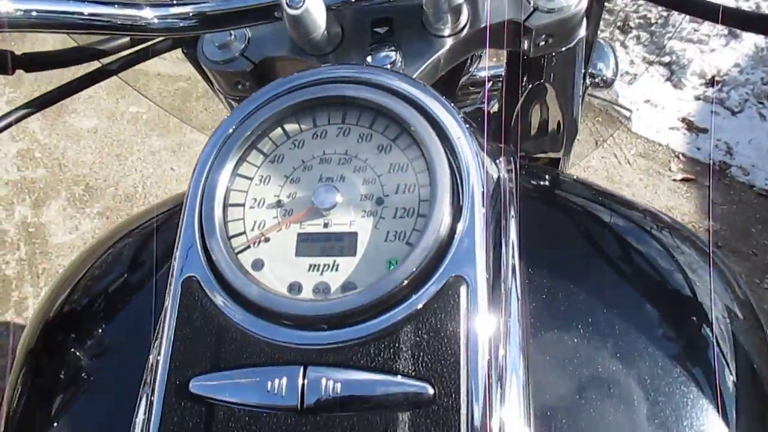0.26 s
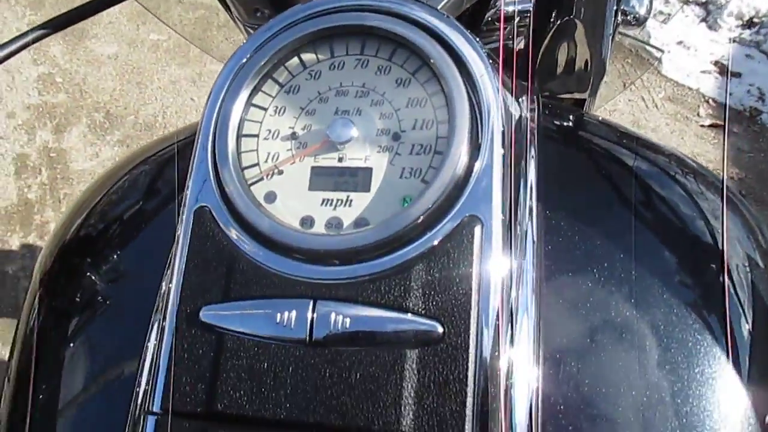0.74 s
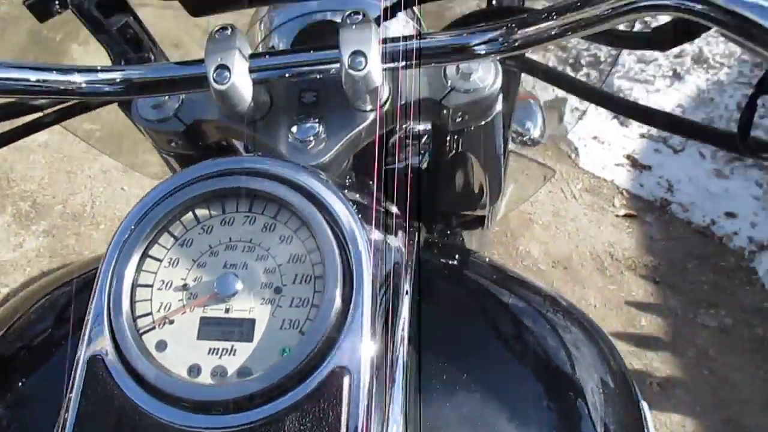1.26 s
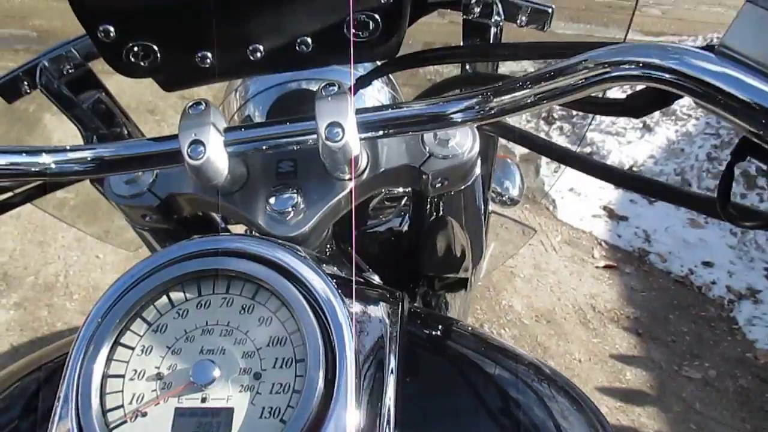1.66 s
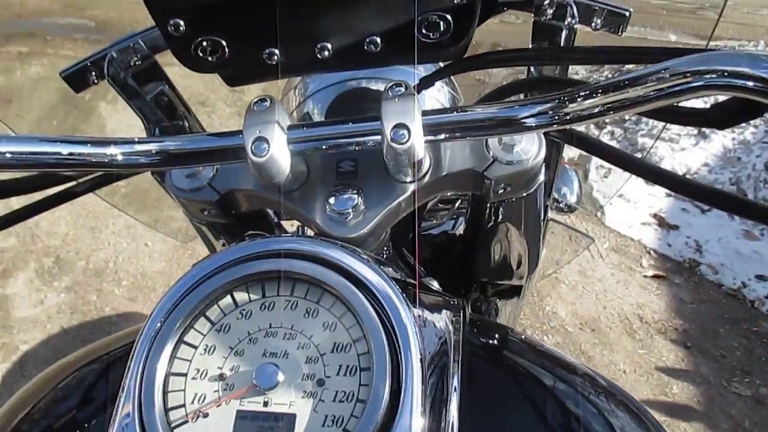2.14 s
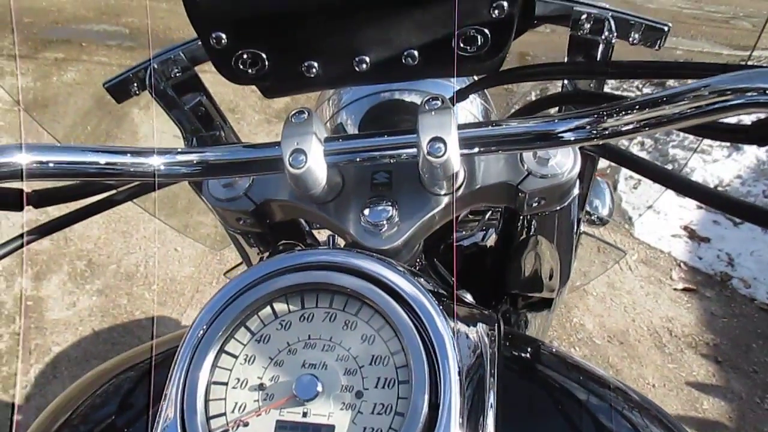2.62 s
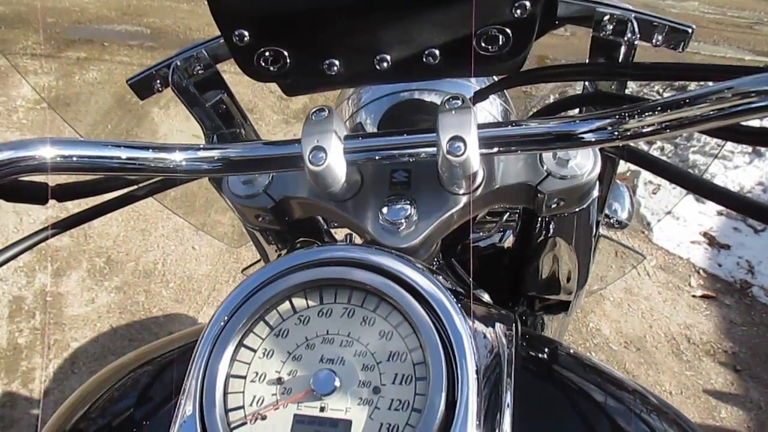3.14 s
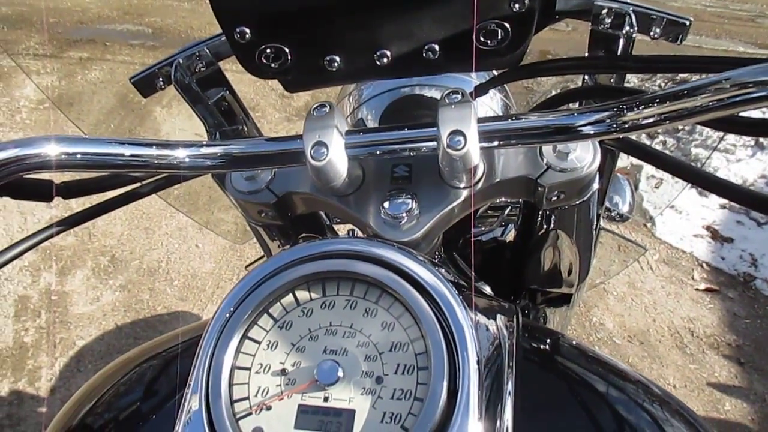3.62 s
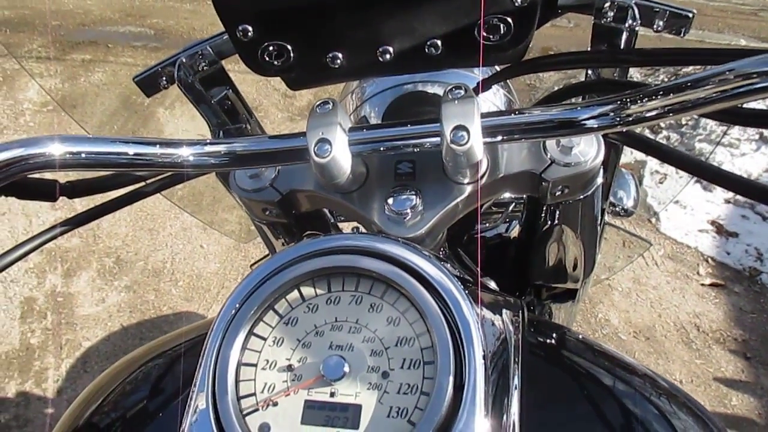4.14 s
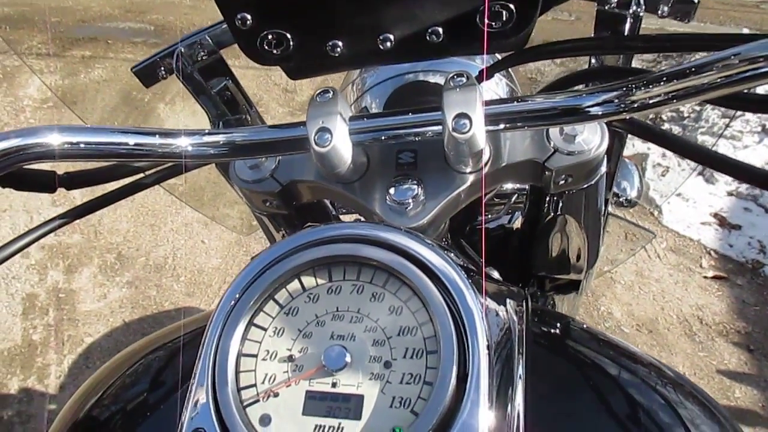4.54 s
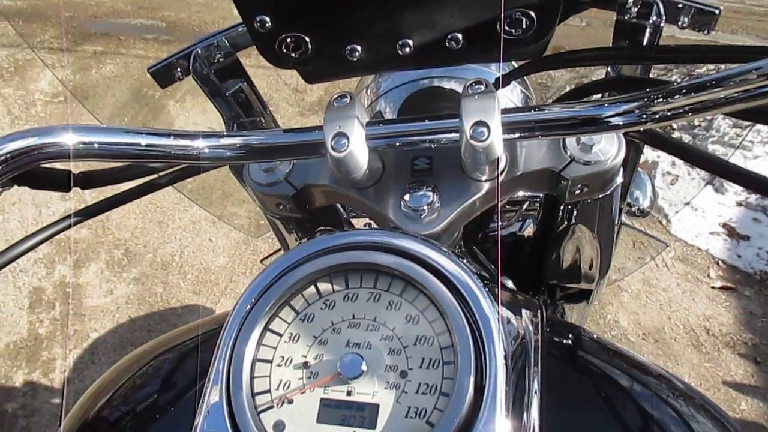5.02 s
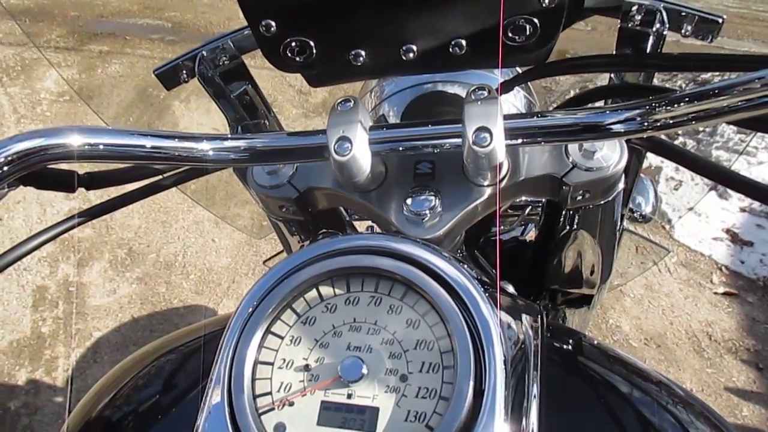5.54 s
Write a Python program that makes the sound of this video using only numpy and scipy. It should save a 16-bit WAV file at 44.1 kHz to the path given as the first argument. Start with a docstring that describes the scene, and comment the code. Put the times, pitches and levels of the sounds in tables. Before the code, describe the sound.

Close, throbbing motorcycle idle with ticking valves, broken by three short throttle twists, a couple of metallic knocks and slight stumbles.

```python
"""First you hear a V-twin motorcycle idling outdoors, from just above its tank.
Its exhaust beats come in pairs and echo in the pipes, over engine clatter and ticking valves.
The throttle gets three quick twists, or blips. Each time the air intake barks and the revs jump;
as they sag, the cold engine coughs and misses a beat. Two of the blips bring a metallic knock.
An automatic volume control turns the sound down at loud barks, then creeps back up."""
import sys
import numpy as np
from scipy import signal
from scipy.fft import rfft, irfft
from scipy.io import wavfile
from scipy.ndimage import uniform_filter1d

SR = 44100
rng = np.random.default_rng(int(sys.argv[2]) if len(sys.argv) > 2 else 0)


def put_to_file(sound):
    """Save the sound as 16-bit audio at rate SR, in the file named by the first command-line argument."""
    columns = np.atleast_2d(sound).T  # one column per channel
    safe = np.clip(columns, -1, 1)
    whole_steps = np.round(safe * 32767)
    wavfile.write(sys.argv[1], SR, whole_steps.astype(np.int16))


N = 254891
T, HZ = np.arange(N) / SR, np.fft.rfftfreq(2 * N, 1 / SR)
REAR_LAG_CYCLES, START_CYCLES = .354, .056  # one engine cycle is two turns of the crank

# each cylinder's exhaust pulse and its echoes in the pipe: delay_s, level_db, bandwidth_hz
FRONT_PIPE = [(0, -3.9, 106), (.0151, 1.3, 88), (.0259, -2, 95)]
REAR_PIPE = [(0, -5.3, 148), (.0151, -5.8, 122), (.0255, -12, 176), (.0428, -12.5, 110)]
# notes at which the silencers and the engine cases ring: pitch_hz, width_hz, boost_db
SILENCER_NOTES = [(94.6, 17.5, 2.5), (159, 16.7, 10), (185, 6, 0.5)]
CASE_NOTES = [(344, 29, 1), (440, 30, 1.5), (529, 54.4, 7), (705, 60.5, 2), (838, 82, 2.5), (973, 52, 2.5),
              (1117, 64, -2.5), (1232, 22, 6), (1385, 35, 7.5), (1529, 76, 7), (1668, 48, 5.5),
              (1925, 31, 6.5), (1997, 67, 7.5), (2380, 126, -2), (2570, 240, 1), (3595, 109, 3),
              (3947, 154, 8), (5626, 195, 4.5), (7710, 230, 4), (8860, 300, 3)]
# valve and piston taps in each cycle: start_cycles, length_cycles, clatter_db, tick_db
ENGINE_TAPS = [(.21, 0.089, -11.5, 2), (0.57, 0.1, -10.5, 2), (.53, 0.0347, -7, -20),
               (.8, 0.014, -8.5, -12.5), (0.9, 0.035, -36, -2.5)]
# the tone of each noise, from bass to treble: pitch_hz, level_db
RUMBLE_TONE = [(14, -37), (28, -13), (60, -5), (100, -5), (160, 0.5), (200, -7.5), (290, -15.5),
               (600, -36.5), (2000, -56.5)]
CLATTER_TONE = [(140, -30.5), (230, 2), (310, -10.5), (345, -3.5), (606, -6), (698, -4.5), (877, -11),
                (975, -7), (1140, -10.5), (1250, -8), (1970, -9.5), (2810, -19), (5480, -27), (10900, -35),
                (15500, -54)]
TICK_TONE = [(1500, -5), (2800, -17), (3700, -2.5), (4800, 2), (5600, 1.5), (7000, -6.5), (10500, -9.5),
             (13000, -18.5), (16000, -27)]
HISS_TONE = [(400, -31), (1800, 12), (4000, 0), (7000, -1), (10500, -3), (13000, -10.5), (16000, -20)]
BOOM_TONE = [(50, -19.5), (110, 2), (165, 8), (220, 1.5), (290, 0.5), (400, -7), (500, -7), (620, -11.5),
             (750, -8), (900, -19), (1400, -21.5), (3000, -34), (9000, -46), (16000, -58)]
RASP_TONE = [(300, -6.5), (900, 3.5), (1600, 5.5), (2300, -1.5), (3000, -7.5), (5000, -18), (13000, -29),
             (16000, -46)]
KNOCK_TONE = [(300, -11), (750, -3.5), (1050, -5.5), (1350, -21), (1550, -3), (1750, -8), (1950, 4),
              (2250, -4.5), (2600, -7), (3300, -22), (6000, -29), (14000, -50)]
# idle speed, which sags after a blip: time_s, speed_rpm
IDLE_SPEED = [(0, 1150.2), (.25, 1160.7), (.45, 1076.5), (1.1, 1149.5), (1.9, 1127.2), (2.7, 943.8),
              (3.4, 1090.1), (3.8, 1091.6), (4.4, 1201.4), (5.1, 961.7), (5.78, 824.4)]
# throttle blips: open_s, shut_s, hiss_db, push_db, pickup_s, climb_s, added_rpm, coast_s
BLIPS = [(1.962, 2.135, -27, 9.2, 1.9464, .1947, 651.8, 0.33),
         (4.4, 4.582, -29.3, 7.3, 4.4614, 0.1789, 686.2, 0.25),
         (5.102, 5.327, -36, 7.3, 5.2133, .0939, 827.6, .3229)]
# missed beats: time_s, change_db
MISFIRES = [(2.485, -16), (4.953, -9), (5.6, -9)]
# intake barks, and small coughs as the revs sag: start_s, length_s, boom_db, rasp_db
BARKS = [(2.014, 0.029, -7.5, -27.5), (2.07, 0.056, -5, -20), (2.406, 0.017, -18, -38),
         (4.451, 0.058, -13.5, -26), (4.541, 0.042, -8.5, -20.5), (4.774, 0.046, -20, -37),
         (4.89, 0.022, -17, -39.5), (5.158, 0.022, -14.5, -31), (5.203, 0.03, -12.5, -23.5),
         (5.253, 0.062, -12.5, -23.5), (5.466, .012, -20, -40), (5.52, 0.017, -17.5, -36)]
# knocks as the engine takes up the load: start_s, level_db
KNOCKS = [(2.019, -13), (5.2, -11.5)]


def amp(db):
    """Turns decibels into a gain to multiply by."""
    return 10 ** (np.asarray(db) / 20)


def unit_power(x):
    """Scales a signal to an average power of one."""
    return x / np.sqrt(np.mean(x ** 2) + 1e-20)


def tone(points):
    """Joins (pitch_hz, level_db) points into a gain for every frequency."""
    hz, db = np.transpose(points)
    return amp(np.interp(np.log(HZ + 1), np.log(hz), db))


def ring(x, gain):
    """Gives x a tone that rings after each tap, never before; white noise keeps its power."""
    log_gain = np.log(np.maximum(unit_power(gain), 1e-5))
    mirrored = np.interp(abs(np.fft.fftfreq(16384, 1 / SR)), HZ, log_gain)
    response = np.fft.ifft(np.exp(np.conj(signal.hilbert(mirrored)))).real[:8192]
    return signal.oaconvolve(x, response)[:N]


def wander(per_s):
    """Glides to a new random value per_s times a second."""
    return unit_power(np.interp(T * per_s, np.arange(N), rng.uniform(-1, 1, N)))


def grit(grain_db):
    """Rough noise, like many tiny hits of uneven size."""
    return unit_power(rng.standard_normal(N) * amp(grain_db * wander(900)))


def exhaust(cycles, rpm, strength_db, level_db=45.2, uneven_db=.96, jitter_s=.000318, outlet_hz=22):
    """Each cylinder sends a pulse down its own pipe, and the pipe echoes it back."""
    strength, beats = amp(strength_db), 0
    # at higher revs the valves open faster, so the pulses are shorter and brighter
    revved = np.clip((rpm - rpm[0]) / (rpm.max() - rpm[0]), 0, 1)
    for lag, pipe in ((0, FRONT_PIPE), (REAR_LAG_CYCLES, REAR_PIPE)):
        fires_at = np.flatnonzero(np.diff(np.floor(cycles - lag), prepend=np.floor(-lag - START_CYCLES)))
        size, late = rng.standard_normal((len(fires_at), 2)).T
        fires_at = np.clip(fires_at + (late * jitter_s * SR).astype(int), 0, N - 1)
        firings = np.zeros(N)
        firings[fires_at] = -strength[fires_at] * amp(uneven_db * size)
        for share, brightness in ((1 - revved, 1), (revved * amp(-4), 1.36)):
            echoes = sum(amp(db) * np.exp(-2j * np.pi * HZ * delay_s - (HZ / hz / brightness) ** 2)
                         for delay_s, db, hz in pipe)
            beats = beats + rfft(firings * share, 2 * N) * echoes
    silencer = 1 + sum((amp(db) - 1) / (1 + 2j * (HZ - hz) / width) for hz, width, db in SILENCER_NOTES)
    s = 1j * HZ / outlet_hz
    outlet = s * s / (1 + s / 2 + s * s)  # an open pipe end sends out no steady pressure
    low_cut = tone([(18, -24), (27, 0)])
    return amp(level_db) * irfft(beats * silencer * outlet * low_cut)[:N]


def gas_rumble(cycles, rpm, level_db=-28, depth=.095, speed_db=5):
    """Swirling gas swells after each pair of beats, and grows with the revs."""
    swell = (1 + depth * np.cos(2 * np.pi * (cycles - .5))) * amp(speed_db * np.log2(rpm / rpm[0]))
    return amp(level_db) * ring(rng.standard_normal(N) * swell, tone(RUMBLE_TONE))


def clatter_and_ticks(cycles, rpm, clatter_db=-28.5, tick_db=-44, speed_db=4, gear_share=.31):
    """Gears churn nonstop; valves and pistons hit at set points in each cycle and ring the cases."""
    churn, ticks = np.ones(N), np.zeros(N)
    for start, length, tap_db, click_db in ENGINE_TAPS:
        age = 2 * ((cycles - start) % 1) / length
        taps = age * np.exp(1 - age) * amp(wander(9))  # a cluster of taps swells and dies
        churn += amp(tap_db) * taps
        ticks += amp(click_db) * taps
    # the same gear teeth and chain links meet again in every cycle
    link_sizes = rng.standard_normal(512)
    link = np.floor(cycles * len(link_sizes)).astype(int)
    gears = unit_power(np.diff(link, prepend=link[0]) * link_sizes[link % len(link_sizes)])
    rattle = np.sqrt(gear_share) * gears + np.sqrt(1 - gear_share) * grit(1.536)
    cases = amp(sum(db / (1 + (2 * (HZ - hz) / width) ** 2) for hz, width, db in CASE_NOTES))
    # the thin cooling fins ring at many close, uneven pitches in the treble
    fins = amp(2 * np.clip(HZ / 2500, 0, 1) * np.interp(HZ / 45, np.arange(N), rng.standard_normal(N)))
    treble_cut = tone([(2500, -.22), (6000, -1.8)])
    clatter = amp(clatter_db) * ring(rattle * churn, tone(CLATTER_TONE) * cases * fins * treble_cut)
    valves = amp(tick_db) * ring(grit(.8) * ticks, tone(TICK_TONE) * fins)
    return (clatter + valves) * amp(speed_db * np.log2(rpm / rpm[0]))


def throttle(snap_s=.018, suction_db=-43.5, misfire_s=.03, droop_db_per_rpm=.008):
    """Each blip lets in air: the beats get stronger and the revs climb, then coast down."""
    rpm = np.interp(T, *np.transpose(IDLE_SPEED))
    strength_db, hiss_gain = 0, 0
    for open_s, shut_s, hiss_db, push_db, pickup_s, climb_s, added_rpm, coast_s in BLIPS:
        held = np.exp(-np.maximum(T - shut_s, 0) / snap_s)
        opening = np.clip((T - open_s) / (shut_s - open_s), 0, 1) ** .64 * held  # rolls on, snaps shut
        coasting = np.exp(-(np.maximum(T - pickup_s - climb_s, 0) / coast_s) ** 2)
        surge = np.clip((T - pickup_s) / climb_s, 0, 1) * coasting
        rpm = rpm + added_rpm * surge
        strength_db = strength_db + push_db * np.sqrt(surge) * held
        suction = amp(suction_db) * surge * (1 - held)  # high revs pull air past the shut throttle
        hiss_gain = hiss_gain + amp(hiss_db) * opening + suction
    missed_db = sum(db * (abs(T - time_s) < misfire_s / 2) for time_s, db in MISFIRES)
    droop_db = droop_db_per_rpm * np.minimum(rpm - rpm[0], 0)  # beats weaken below normal idle
    return rpm, strength_db + droop_db + missed_db, hiss_gain


def air_intake(hiss_gain, rise_s=.012, fall_s=.0189):
    """Air hisses through the throttle, and each gulp of it barks in the air box."""
    boom_gain, rasp_gain = np.zeros(N), np.zeros(N)
    for start_s, length_s, boom_db, rasp_db in BARKS:
        age_s = T - start_s
        gulp = np.clip(age_s / rise_s, 0, 1) * np.exp(-np.maximum(age_s - length_s, 0) / fall_s)
        boom_gain += amp(boom_db) * gulp
        rasp_gain += amp(rasp_db) * gulp
    hiss = ring(grit(2) * hiss_gain, tone(HISS_TONE))
    boom = ring(grit(5) * boom_gain, tone(BOOM_TONE))
    rasp = ring(grit(2.5) * rasp_gain, tone(RASP_TONE))
    return hiss + boom + rasp


def knocks(rise_s=.0016, decay_s=.023, level_db=-1):
    """A hard blow makes the engine block ring briefly at many pitches."""
    blows = sum(amp(db) * np.clip((T - start_s) / rise_s, 0, 1) * np.exp(-abs(T - start_s) / decay_s)
                for start_s, db in KNOCKS)
    return amp(level_db) * ring(rng.standard_normal(N) * blows, tone(KNOCK_TONE))


def scene():
    """The throttle sets the engine's pace, and all the sounds add up in one channel."""
    rpm, strength_db, hiss_gain = throttle()
    cycles = START_CYCLES + np.cumsum(rpm / 120) / SR
    engine = exhaust(cycles, rpm, strength_db) + gas_rumble(cycles, rpm) + clatter_and_ticks(cycles, rpm)
    return (engine + air_intake(hiss_gain) + knocks())[None]


def record(dry, limit_db=-9, recover_db_per_s=6, average_s=.017, top_hz=15700):
    """Volume drops fast on loud sound and creeps back; peaks are rounded and the top treble is cut."""
    power_db = 10 * np.log10(abs(uniform_filter1d(dry[0] ** 2, int(average_s * SR))) + 1e-12)
    recovery_db = T * recover_db_per_s
    peak_db = np.maximum.accumulate(power_db + recovery_db) - recovery_db
    over_db = np.maximum(peak_db - limit_db, 0)
    turned_down = dry / amp(uniform_filter1d(over_db, size=200))
    rounded = turned_down / (1 + turned_down ** 8) ** (1 / 8)
    treble_cut = signal.firwin(511, top_hz, window=("kaiser", 9), fs=SR)
    return signal.oaconvolve(rounded, treble_cut[None], "same")


dry = scene()
out = record(dry)
put_to_file(out)
```